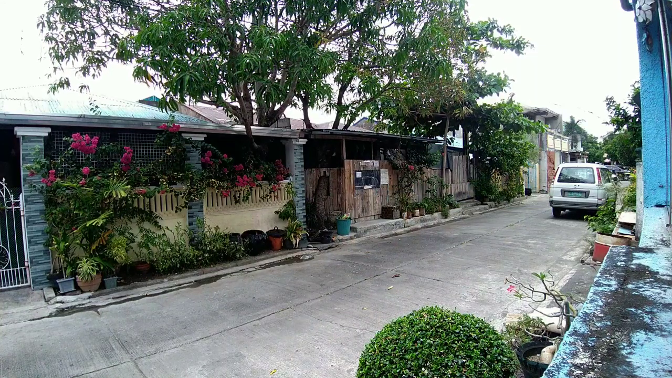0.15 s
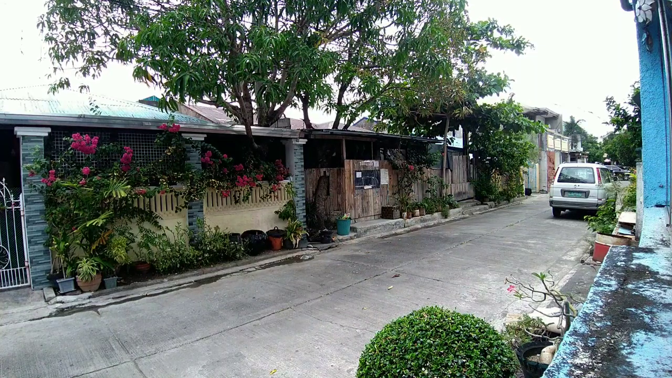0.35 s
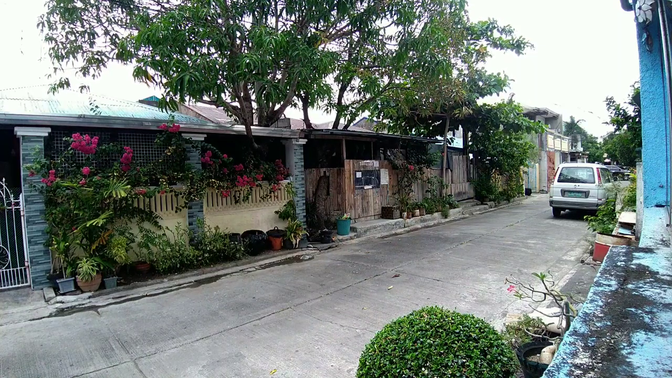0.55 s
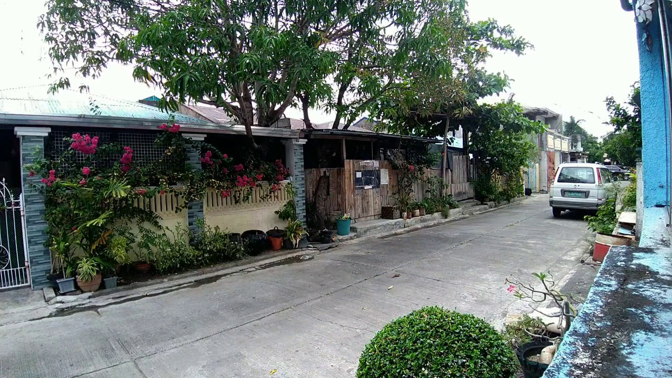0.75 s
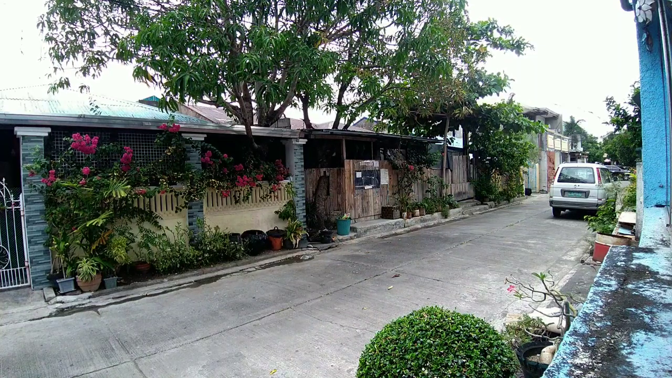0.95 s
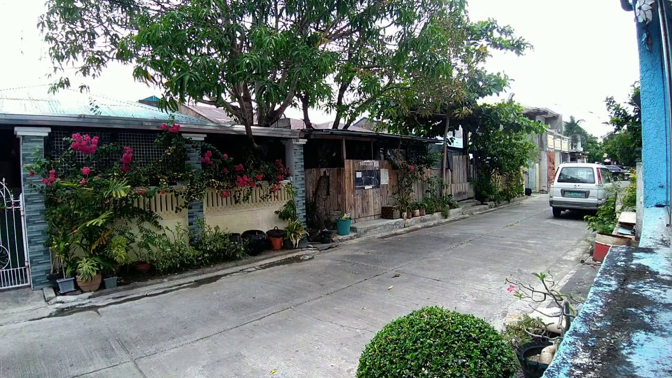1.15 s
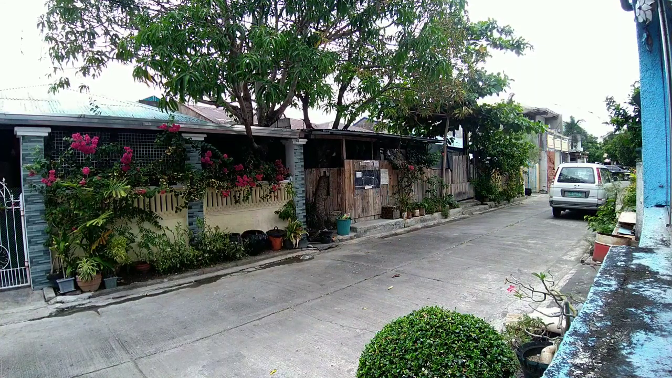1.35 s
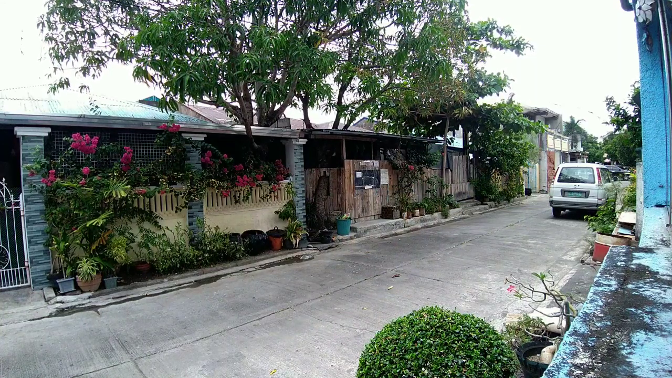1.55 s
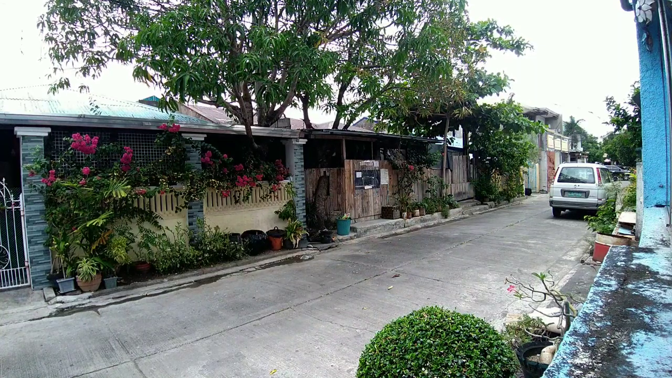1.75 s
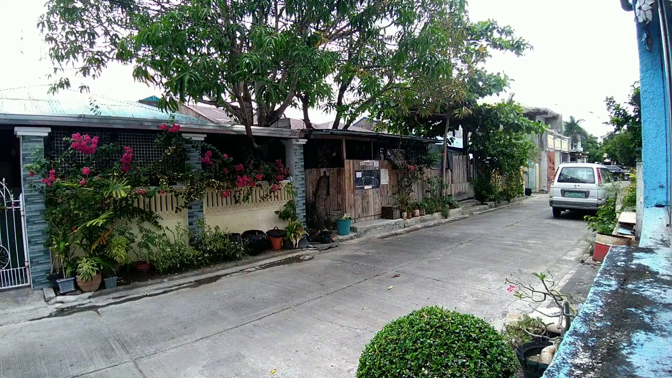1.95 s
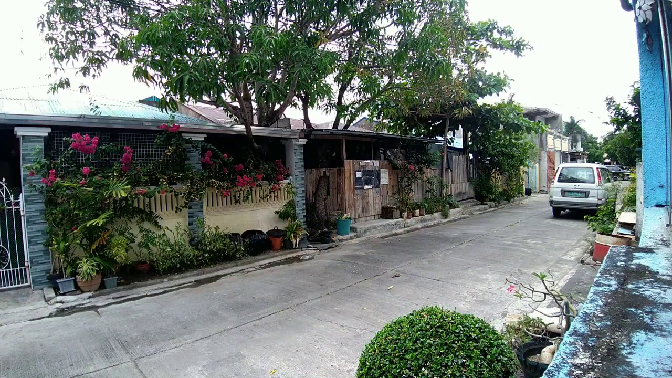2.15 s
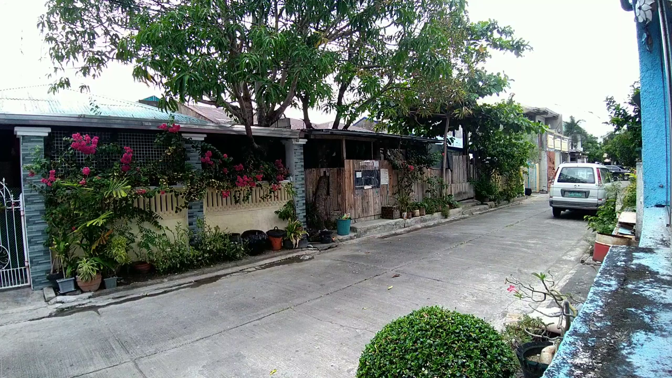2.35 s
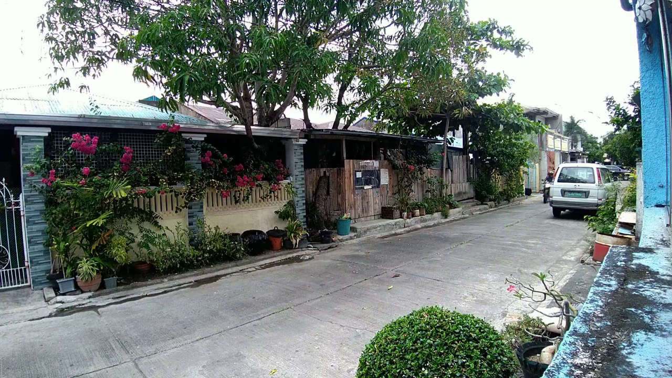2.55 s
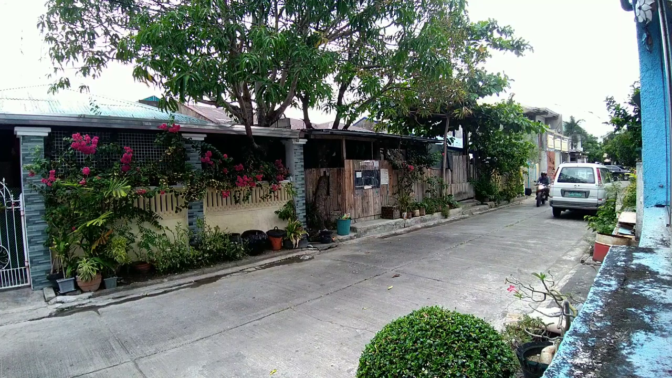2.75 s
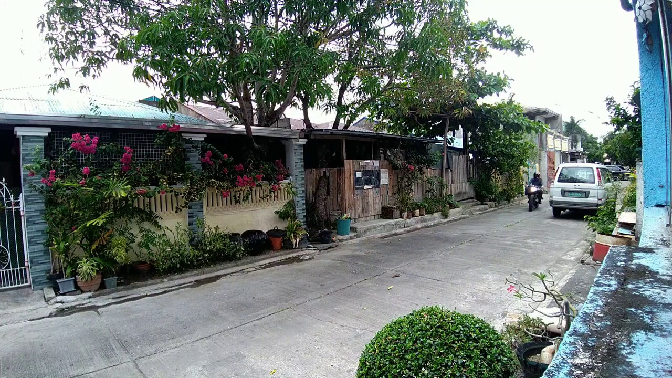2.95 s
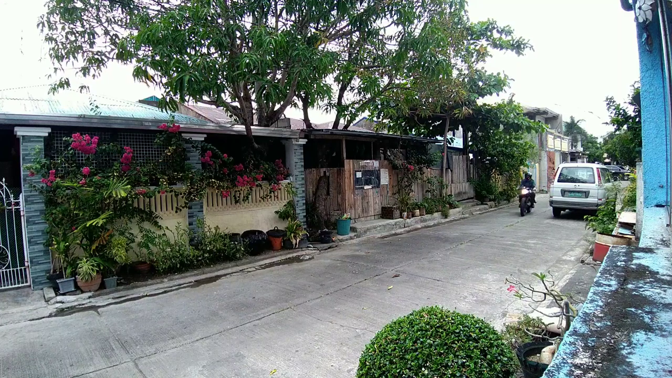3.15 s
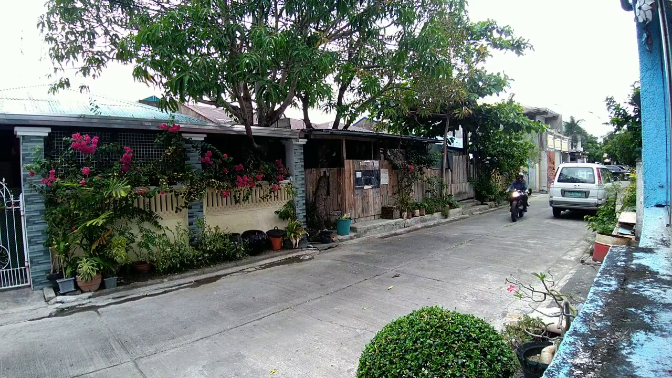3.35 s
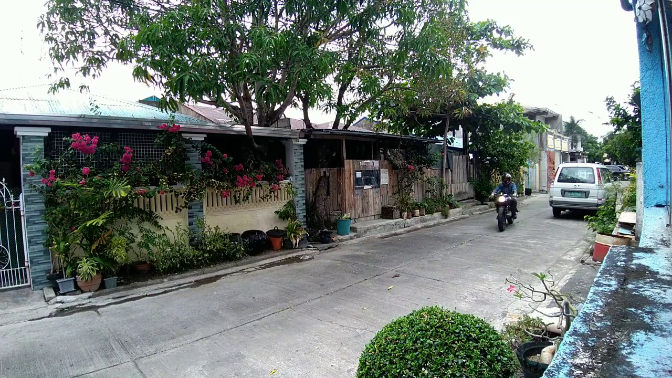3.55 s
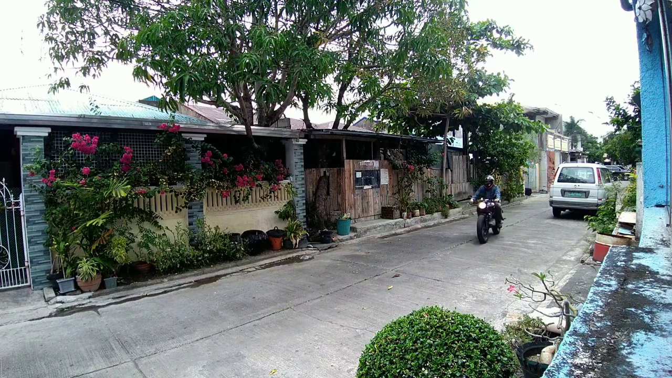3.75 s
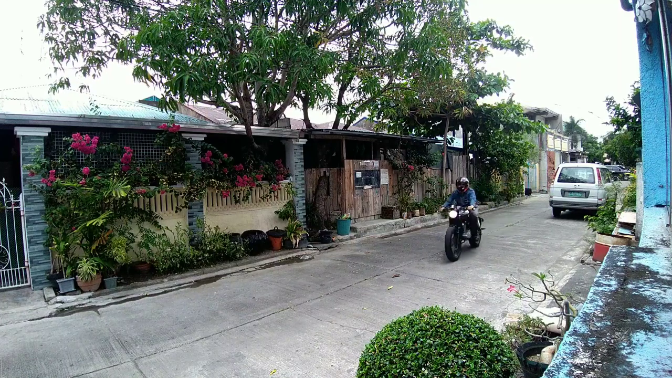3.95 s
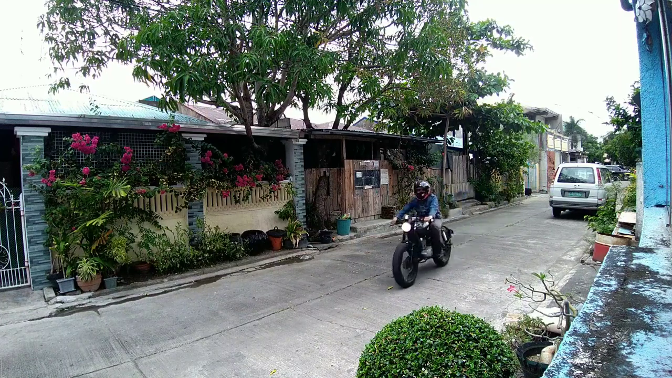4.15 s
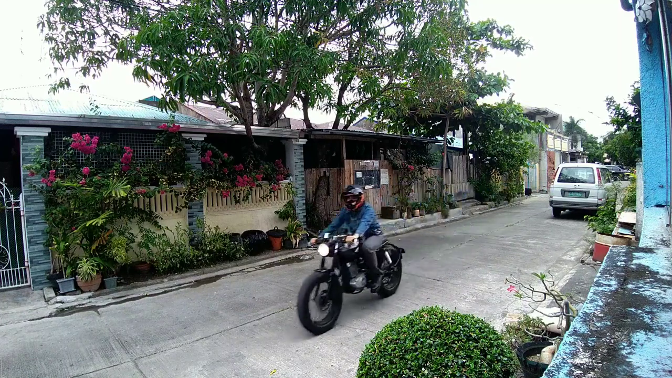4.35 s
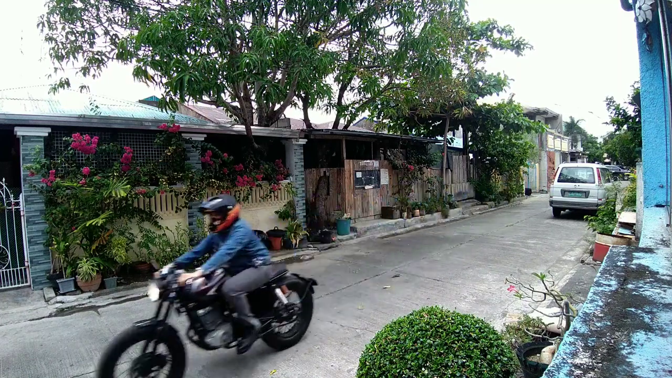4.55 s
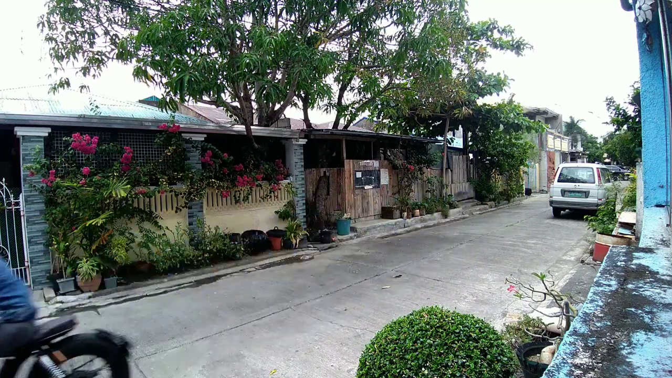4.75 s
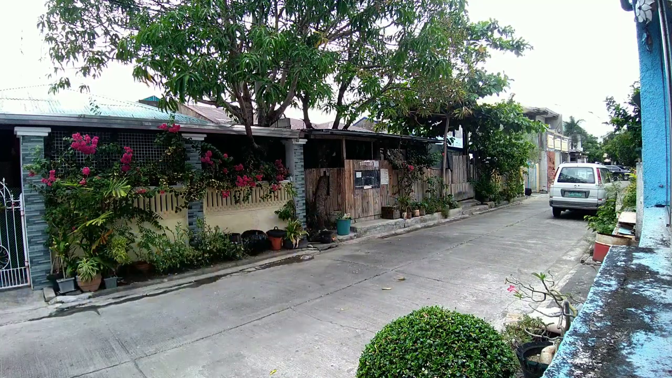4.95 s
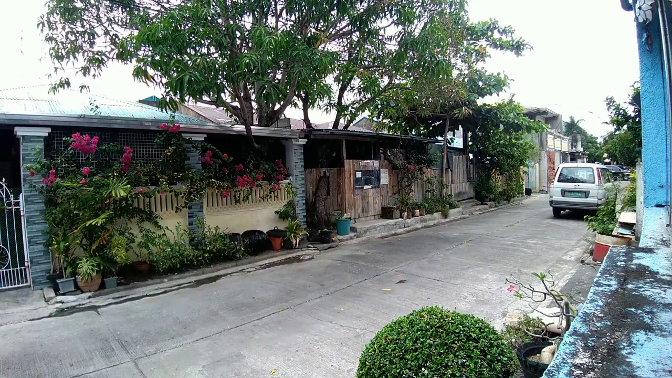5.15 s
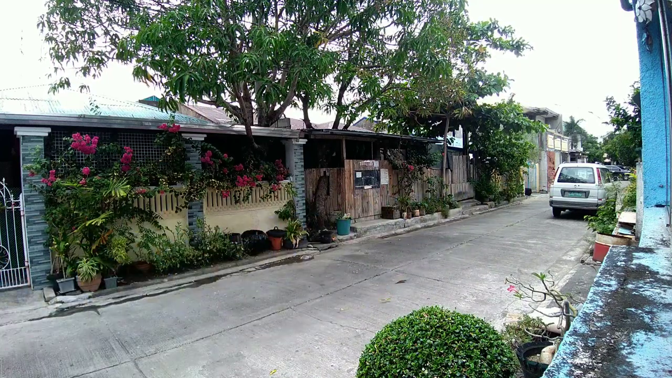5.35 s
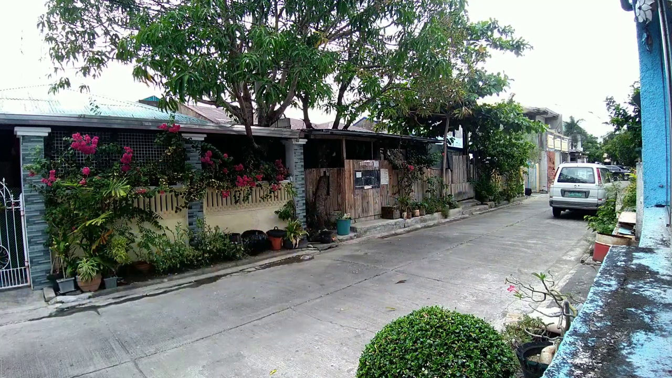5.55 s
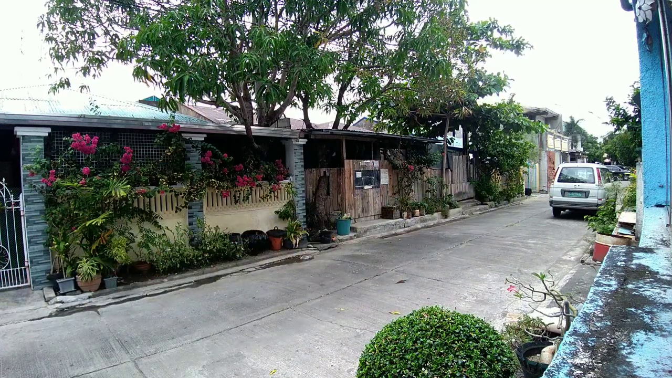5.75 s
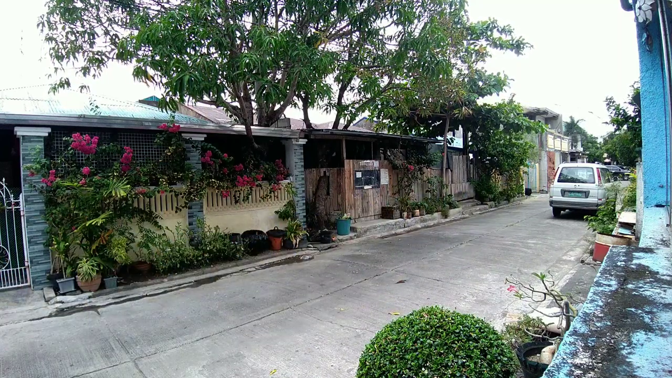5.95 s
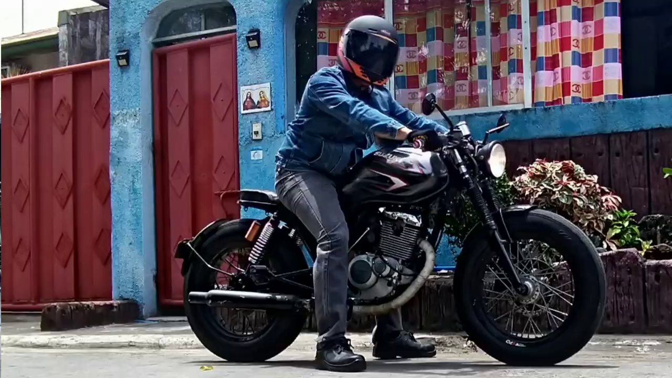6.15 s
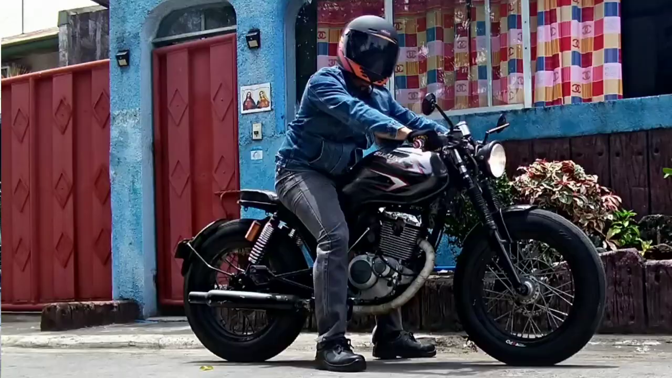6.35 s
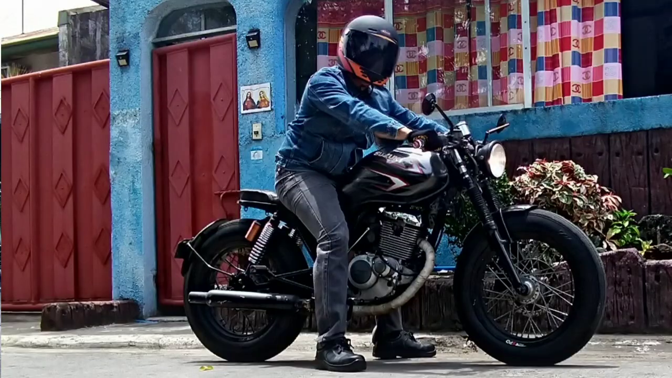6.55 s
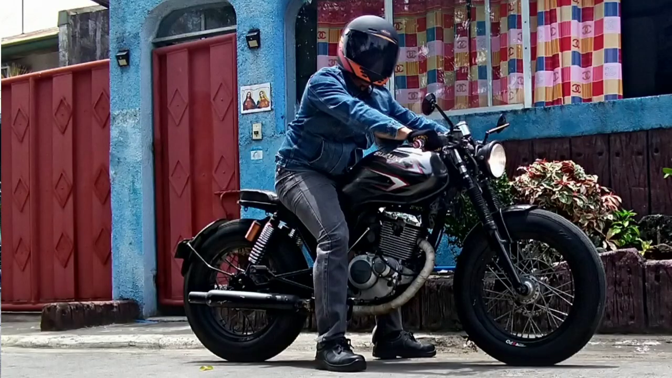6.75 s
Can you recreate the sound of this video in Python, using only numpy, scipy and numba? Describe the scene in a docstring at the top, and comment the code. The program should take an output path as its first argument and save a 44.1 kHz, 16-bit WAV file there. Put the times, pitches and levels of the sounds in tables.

```python
"""A narrow street: a single-cylinder four-stroke motorcycle accelerates and passes about three metres away.
Under throttle each firing pulse barks through the ringing modes of the silencer, with rasping gas noise.
Between throttle blips the revs sink and resonances of the pipe boom, down to a lumpy idle.
Filtered noise makes the hiss of chain and tyres and the ticking valve gear; decaying modes make metal clinks.
House fronts and a parked car throw the exhaust back; a faint hum of distant streets lies below."""
import sys
import numpy as np
from scipy import signal
from scipy.fft import rfft, irfft
from scipy.io import wavfile
from scipy.ndimage import uniform_filter1d, map_coordinates
from numba import njit

SR = 44100
rng = np.random.default_rng(int(sys.argv[2]) if len(sys.argv) > 2 else 0)


def generate_wav(sig):
    """Save sig (samples, or channels by samples) to the path in sys.argv[1] as 16-bit PCM at SR."""
    pcm = np.round(np.clip(np.atleast_2d(sig).T, -1, 1) * 32767).astype(np.int16)
    wavfile.write(sys.argv[1], SR, pcm)


N = 299560
TIME = np.arange(N) / SR
# the ride: a straight line past the kerb, coming out from behind a parked car
ROAD_M_S, PASSES_S, KERB_M, CLEARS_CAR_S = 6.31, 4.832, 2.927, 2.69
REFERENCE_HZ = 36  # firing rate from which octaves of revs are counted


def undb(db):
    """Decibels to gain."""
    return 10 ** (np.asarray(db) / 20)


def curves(table):
    """The columns of a table, joined by straight lines in time."""
    s, *columns = np.transpose(table)
    return [np.interp(TIME, s, c) for c in columns]


def steady(x):
    """Hold the RMS level at 1 over a few engine cycles, keeping the single beats."""
    size = SR // 10
    power = uniform_filter1d(uniform_filter1d(x ** 2, size), size)
    return x / np.sqrt(np.maximum(power, 1e-18))


def colour(x, points, size=8192):
    """Filter by (frequency [Hz], gain [dB]) points; minimum phase, so attacks stay sharp."""
    hz, db = np.transpose(points)
    f = np.maximum(np.arange(size // 2 + 1) * SR / size, 1)
    log_gain = np.log(undb(np.interp(np.log(f), np.log(hz), db)))
    cepstrum = irfft(log_gain)[:size // 2]
    response = irfft(np.exp(rfft(2 * cepstrum, size) - cepstrum[0]))
    response = response.reshape((1,) * (x.ndim - 1) + (-1,))
    return signal.oaconvolve(x, response, axes=-1)[..., :N]


def walk(rate):
    """Slow random curve with a spread near 1, drawn anew `rate` times a second."""
    size = int(SR / rate)
    held = np.repeat(rng.standard_normal(N // size + 1), size)
    return np.sqrt(2) * uniform_filter1d(uniform_filter1d(held, size), size)[:N]


@njit
def band(x, hz, width):
    """State-variable band-pass whose centre and width can move."""
    y, b, l = np.empty(len(x)), 0., 0.
    for i in range(len(x)):
        g, k = np.tan(np.pi * hz[i] / SR), width[i] / hz[i]
        v = (b + g * (x[i] + 1e-18 - l)) / (1 + g * (g + k))
        b, l, y[i] = 2 * v - b, l + 2 * g * v, k * v
    return y


def ring(x, hz, width):
    """A resonance: a narrow band-pass, then a broad one that softens its onset."""
    centre = hz * np.ones(N)
    return band(band(x, centre, width * np.ones(N)), centre, centre)


def delay(x, ms):
    """Delay by a fixed or moving time."""
    return np.interp(TIME - ms / 1000, TIME, x, left=0)


def diffuse(spacing_m=0.18):
    """Noise from all sides at two spaced microphones: alike in the bass, unrelated in the treble."""
    alike = np.sinc(2 * spacing_m / 343 * np.arange(N // 2 + 1) * SR / N)
    mid, side = rfft(rng.standard_normal((2, N))) * np.sqrt([1 + alike, 1 - alike])
    return irfft([mid + side, mid - side], N) / np.sqrt(2)


def burst(phase, start, length):
    """A gate that opens at one crank position and dies away within the cycle; both in cycles."""
    return np.exp(-((phase - start) % 1) / length)


def loudness(ride, db, load_db=0, octave_db=0, metre_db=0, hidden_db=0):
    """Gain of a layer: its level at the kerb, changed by load, revs, distance and the parked car's shadow."""
    rate, load, metres = ride
    octaves = np.log2(rate / REFERENCE_HZ)
    clearing_s = 0.12
    hidden = .5 - .5 * np.tanh((TIME - CLEARS_CAR_S) / clearing_s)
    level_db = db + load_db * load + octave_db * octaves
    level_db = level_db + metre_db * (metres - KERB_M) + hidden_db * hidden
    return undb(level_db) * KERB_M / metres


def crank(rate):
    """Engine cycles run so far: the speed wavers a little, and shudders at the top of the run."""
    start_cycles, hunt_cycles, hunt_per_s = .808, .011, 7
    shudder_s, shudder_length_s, shudder_hz, shudder_cycles = 3.21, .36, 4.75, .033
    since = TIME - shudder_s
    shudder = np.cos(2 * np.pi * shudder_hz * since) * np.exp(-(since / shudder_length_s) ** 4)
    run = start_cycles + np.cumsum(rate) / SR
    return run + hunt_cycles * walk(hunt_per_s) - shudder_cycles * shudder


def throttle():
    """Load 0-1 and extra dB of bark, boom and drone: opening loads the engine, shutting makes the pipe boom."""
    # twists of the throttle: (opens [s], held [s], extra bark [dB],
    # surge of the boom on shutting [dB], surge of the drone on shutting [dB])
    twists = [(-.5, 4.045, 0, 12, 12), (4.0, .15, 2, 11.5, 3), (4.35, .16, 2.5, 16, 3),
              (4.96, .22, 3.5, 15, 4), (5.83, .23, 3, 6, -4), (6.34, .28, 6, 3, 3)]
    twist_s, unload_s, surge_s = .018, 0.016, 0.41  # ramp of a twist; decay of load; decay of surge
    load, bark_db, boom_db, drone_db = np.zeros((4, N))
    for opens, held, bark, boom, drone in twists:
        shuts = opens + held
        opened, shut = (np.clip((TIME - s) / twist_s + .5, 0, 1) for s in (opens, shuts))
        since = np.maximum(TIME - shuts, 0)
        surge = shut * np.exp(-since / surge_s)
        # each twist takes over from the one before
        load += opened * (np.exp(-since / unload_s) - load)
        bark_db += opened * (bark - bark_db)
        boom_db += opened * (boom * surge - boom_db)
        drone_db += opened * (drone * surge - drone_db)
    return load, bark_db, boom_db, drone_db


def firings(phase, rate, scatter_db, idle_db, jitter_ms):
    """One pulse a cycle; combustion grows uneven as the revs drop to idle, and now and then fails."""
    # misfires with the throttle shut: time [s]
    misfires = [3.89, 4.809, 5.406, 6.209]
    misfire_s, misfire_db = 0.019, -13
    at = np.flatnonzero(np.diff(np.floor(phase)))
    chance = rng.standard_normal((len(at), 2))
    idle = np.interp(rate[at], [22, 34], [1, 0])
    missed = sum(np.exp(-((TIME[at] - s) / misfire_s) ** 2) for s in misfires)
    size = undb((scatter_db + idle_db * idle) * chance[:, 0] + misfire_db * missed)
    late = (jitter_ms * SR / 1000 * chance[:, 1]).astype(int)
    return np.bincount(np.clip(at + late, 0, N - 1), size, N)


def exhaust(pulses, phase, ride, behind, bark_db):
    """Each firing cracks out of the pipe and rings the silencer; a puff of gas rasps after it."""
    # silencer modes: (frequency [Hz], width [Hz], relative level from ahead [dB], from behind [dB])
    silencer = [(255, 26, -22, 4), (287, 79, 7, 3.5), (372.2, 46, 4, 16.5), (439.6, 37, 7.5, 10),
                (494, 16.7, 4.5, 1), (543, 47, 11, -9.5), (583, 58, -3, -28), (661, 31, -17, -6),
                (932, 42, -5, -29)]
    # tone of the rasp: (frequency [Hz], gain [dB])
    rasp_tone = [(120, -0.5), (450, 2), (650, 4), (820, 0.5), (940, 3.5), (1130, -3.5), (1330, -7.5),
                 (1550, -6.5), (1800, -33), (3000, -56)]
    # tone of the bark: (frequency [Hz], gain [dB])
    bark_tone = [(600, 2), (950, -3.5), (1400, -21)]
    rate, load, metres = ride

    # from ahead the pipe is also heard off the house front; that echo lags more as the motorcycle nears
    wall_m = 6.81  # sideways distance of the mirror image in the house front
    wall_ms = 1000 * (np.sqrt(metres ** 2 - KERB_M ** 2 + wall_m ** 2) - metres) / 343
    wall_gain = .55 * (1 - behind) * np.interp(metres, [6, 11], [.3, 1])
    blows = pulses + wall_gain * delay(pulses, wall_ms)
    # walls across the road: weaker and later
    blows = blows + .25 * (1 - .5 * behind) * delay(pulses, 7.5 + .5 * walk(4))
    # close by and past the microphones, garden walls fill the gaps between the firings
    close = np.maximum(np.interp(metres, [6, 9], [1, 0]), behind) * (.85 - .4 * behind)
    garden = .5 * delay(pulses, 9 + .6 * metres) + .45 * delay(pulses, 19.5 - .4 * metres)
    blows = blows + close * garden

    # higher revs favour the upper modes
    bright = 2 * np.log2(np.maximum(rate, 30) / REFERENCE_HZ)
    # close by and from ahead, neighbouring modes swing in opposite senses, which softens the attack
    swing = 1 - 2 * np.interp(metres, [6.5, 8.5], [1, 0]) * (1 - behind)
    bark = 0
    for k, (hz, width, ahead_db, behind_db) in enumerate(silencer):
        mode_gain = (hz / 400) ** bright * undb(ahead_db + behind * (behind_db - ahead_db))
        bark = bark + swing ** (k % 2) * ring(blows, hz, width) * mode_gain
    bark = steady(colour(bark, bark_tone)) * undb(bark_db)

    # just past the parked car the pipe points at it; that echo recedes, so it sounds a little flat
    car_echo_db, car_aim_m, car_spread_m = -6, 3.58, 1.2
    past_m = ROAD_M_S * np.maximum(TIME - CLEARS_CAR_S, 0)
    car_ms = 2 * 1000 * past_m / 343
    aimed = np.exp(-((past_m - car_aim_m) / car_spread_m) ** 2)
    bark = (bark + undb(car_echo_db) * aimed * delay(bark, car_ms)) * undb(4.4 * aimed)

    gas = (burst(phase, 0.03, 0.3) + 0.35) * rng.standard_normal(N)
    crack = np.interp(metres, [5, 9], [.6, 1.1]) * (1 - .3 * behind)
    rasp = steady(crack * steady(colour(blows, rasp_tone)) + .45 * steady(colour(gas, rasp_tone)))
    bark_gain = loudness(ride, db=-38.5, load_db=12.5, octave_db=9.5, metre_db=-0.0966, hidden_db=2.0)
    rasp_gain = loudness(ride, db=-43, load_db=4, octave_db=39, metre_db=0.3156, hidden_db=-2.5)
    return bark * bark_gain + rasp * rasp_gain


def pipe_notes(pulses, ride, boom_db, drone_db):
    """The pipe's low notes: a boom, lower and longer at idle, and a drone that follows the revs under load."""
    # tone of the boom: (frequency [Hz], gain [dB])
    boom_tone = [(170, 5), (280, -5), (1000, -35)]
    # tone of the drone: (frequency [Hz], gain [dB])
    drone_tone = [(230, 7), (320, -16), (1000, -17)]
    rate, load, metres = ride
    revs = rate / REFERENCE_HZ
    pull = load * np.clip((rate - 24) / 8, 0, 1)
    boom = ring(pulses, 105 * revs ** .33, width=20 * revs ** 1.3)
    boom = steady(colour(boom, boom_tone)) * undb(boom_db - 8.1 * pull)
    boom = boom * loudness(ride, db=-26.5, octave_db=-3, metre_db=0.35)
    drone_hz = 158 + load * (4.7 * np.maximum(rate, 32) - 158)
    drone = ring(pulses, drone_hz, width=55 + 45 * load)
    drone = steady(colour(drone, drone_tone)) * undb(drone_db)
    # far off the drone is weaker and wavers
    fading_db = np.interp(metres, [6, 12], [0, 1]) * (1.5 * walk(9) - 4.5)
    drone = drone * undb(fading_db) * loudness(ride, db=-26.5, load_db=1.0, octave_db=12.5, metre_db=0.0982)
    return boom - drone  # neighbouring modes swing in opposite senses


def growl(phase, ride, behind, boom_db):
    """Overtones of the revs swell between firings: with the throttle shut, and close by from ahead."""
    # overtones: (multiple of the firing rate, relative level [dB], slope [dB per octave of revs])
    overtones = [(9.17, -8.5, 54), (10.02, -1, 32), (11, -14, -3), (12, -9, 39), (12.8, -19, 25),
                 (13.81, -7.5, 30), (14.52, -17, 10), (16.5, -16, 18), (21.3, -23, 32), (23.8, -19, 31),
                 (31.4, -20, 35)]
    swell_cycle = 0.2935  # where in the cycle the growl swells, after the firing
    rate, load, metres = ride
    octaves = np.log2(rate / REFERENCE_HZ)
    close = np.interp(metres, [5, 7], [1, 0]) * (1 - behind)
    tones = 0
    for k, db, octave_db in overtones:
        tone_gain = undb(db + octave_db * octaves + walk(14))
        tones = tones + tone_gain * np.cos(2 * np.pi * k * (phase - swell_cycle) + .5 * walk(4))
    drive_db = np.maximum(.65 * boom_db, 6 * load * close)
    drive = undb(drive_db) * np.clip(boom_db / 3 + close, 0, 1)
    return tones * drive * loudness(ride, db=-35, metre_db=0.23)


def hum(phase):
    """The second harmonic of the firings carries far as a low hum."""
    # RMS level of the hum, then smoothed: (time [s], level [dB])
    hum_level = [(0.3, -61), (0.9, -43), (1.25, -38.5), (1.6, -50), (2.0, -48), (2.2, -33.5), (2.47, -31),
                 (2.63, -35.5), (2.75, -32.5), (3.0, -34.5), (3.1, -41), (3.4, -34.5), (3.55, -43),
                 (3.9, -60), (4.05, -31.5), (4.6, -30.5), (4.9, -41), (5.2, -63)]
    gain = undb(uniform_filter1d(curves(hum_level)[0], size=SR // 20))
    return -np.sqrt(2) * np.sin(4 * np.pi * phase) * gain


def running_gear(phase, ride):
    """Chain and tyres hiss, sinking in pitch as they pass; the engine clatters at firings and valve shuttings."""
    # tone of the clatter: (frequency [Hz], gain [dB])
    clatter_tone = [(300, -31.5), (1000, 4.5), (1700, 1), (2600, -0.5), (4200, -3), (6000, -3.5),
                    (8000, -4), (11000, -12)]
    # tone of the hiss: (frequency [Hz], gain [dB])
    hiss_tone = [(3240, -47), (5500, -17), (8440, -8), (11100, 4.5), (14000, -9.5), (15100, -8),
                 (15800, -31)]
    flare_s, flare_length_s, flare_db = 4.465, 0.089, 3.5  # the clatter flares briefly
    knocks = 0.097 * burst(phase, 0, 0.019) + 0.069 * burst(phase, 0.29, 0.038)
    grain = undb(0.99 * walk(400) + 1.6 * walk(14))
    sent = (TIME - (ride[2] - KERB_M) / 343) * SR  # sample being heard: Doppler
    still = colour(rng.standard_normal((2, N)), hiss_tone)
    hiss = np.array([map_coordinates(side, [sent], mode="mirror") for side in still])
    hiss = steady(hiss * grain * (1 + .5 * knocks))
    flare = undb(flare_db * np.exp(-((TIME - flare_s) / flare_length_s) ** 2))
    clatter = colour(rng.standard_normal((2, N)) * grain * (1 + knocks), clatter_tone)
    clatter = steady(clatter) * flare
    hiss_gain = loudness(ride, db=-34.0, load_db=0.0, octave_db=8.5, metre_db=-0.4526, hidden_db=-3.0)
    clatter_gain = loudness(ride, db=-41.5, load_db=1.0, octave_db=11.0, metre_db=0.1022, hidden_db=-3.5)
    return hiss * hiss_gain + clatter * clatter_gain


def clinks():
    """Loose metal jolted by the road and the lumpy idle; each jolt scrapes and favours other modes."""
    # jolts: (time [s], gain [dB], where it rings most [Hz])
    jolts = [(4.949, -30.5, 5430), (5.25, -52, 8800), (5.427, -47, 4650), (5.467, -47.5, 7360),
             (5.857, -51, 4770), (5.901, -49, 4700), (5.948, -50.5, 4550), (5.9913, -50, 5350),
             (6.3663, -45, 12300), (6.416, -47.5, 7300), (6.4613, -51, 7500), (6.502, -52, 7400),
             (6.545, -53, 7000)]
    # modes of the metal: (frequency [Hz], relative level [dB])
    metal = [(4600, -5), (5150, 0.5), (5450, -8), (6080, -17), (7450, -8.5), (8900, -14), (11250, 10.5),
             (11780, -8)]
    t60_s, attack_s = .11, 0.00097
    favoured_octaves, spill = 0.073, 0.48  # spread of the favoured modes; share left to the others
    out, t = np.zeros((2, N + SR)), TIME[:SR // 5]
    hz, db = np.transpose(metal)
    for s, level_db, centre_hz in jolts:
        favoured = np.exp(-(np.log2(hz / centre_hz) / favoured_octaves) ** 2)
        sizes = undb(db) * (spill + favoured)
        modes = sizes @ np.sin(2 * np.pi * (hz[:, None] * t + rng.random((2, len(hz), 1))))
        noise = rng.standard_normal((2, len(t)))
        centre, width = np.full(len(t), float(centre_hz)), np.full(len(t), centre_hz / 5)
        scrape = np.array([band(side, centre, width) for side in noise])
        hit = (.6 * modes + 2.2 * scrape + .5 * noise) * np.exp(-np.log(1000) * t / t60_s)
        i = int(s * SR)
        out[:, i:i + len(t)] += undb(level_db) * hit * np.minimum(t / attack_s, 1)
    return out[:, :N]


def street_echo(x, t60_s=0.93, gap_s=0.0091):
    """House fronts and parked cars scatter the sound into a short tail with little bass."""
    tail = diffuse() * np.exp(-np.log(1000) * TIME / t60_s) * np.clip(TIME / gap_s - .5, 0, 1)
    tail = tail / np.sqrt(np.sum(tail[0] ** 2))
    tail = colour(tail, [(20, 0), (110, 2), (300, 5), (900, 5), (4000, 6), (16000, -11)])
    return signal.fftconvolve(x[None], tail[:, :SR], axes=1)[:, :N]


def neighbourhood():
    """A faint, nearly steady hum of distant streets: coloured diffuse noise."""
    # tone of the distant streets: (frequency [Hz], gain [dB])
    street_tone = [(15, -95), (25, -11), (71, -11), (202, -14.5), (278, -5), (515, -16.5), (811, -35.5),
                   (5280, -51), (10000, -37), (13500, -52), (15000, -85)]
    swell_db = walk(1)
    return steady(colour(diffuse(), street_tone)) * undb(-45 + swell_db)


def scene():
    """The motorcycle reaches the left microphone first, later the right; the echo counts most far off."""
    # engine speed: (time [s], firing rate [1/s])
    speed = [(0.0, 28.44), (0.27, 32.1), (0.9, 34.38), (1.55, 39.64), (2.11, 41.68), (2.41, 43.13),
             (3.49, 45.53), (3.94, 34.08), (4.16, 37.32), (4.32, 33.57), (4.47, 38.96), (4.96, 28.98),
             (5.19, 32.51), (5.5, 25.36), (5.8, 20.44), (6.05, 23.51), (6.28, 19.22), (6.58, 25.06),
             (6.79, 23.89)]
    # gain of bark and rasp on the way up: (time [s], gain [dB])
    approach = [(0, -7), (.6, -2), (1.3, 2.5), (1.8, 1.5), (2.3, -2.5), (3.0, -0.5)]
    aim_rad, port_lag_ms = 0.94, 0.66  # turn of the microphone pair; largest lag between the two
    rate, = curves(speed)
    phase = crank(rate)
    load, bark_db, boom_db, drone_db = throttle()
    along = ROAD_M_S * (TIME - PASSES_S)
    metres = np.hypot(along, KERB_M)
    ride = rate, load, metres
    bearing = np.sin(np.arctan2(along, KERB_M) + aim_rad)
    behind = np.interp(bearing, [-.65, .15], [0, 1])  # share of the pipe mouth in view

    pulses = firings(phase, rate, scatter_db=.8, idle_db=1.2, jitter_ms=0.04)
    pipe = pipe_notes(pulses, ride, boom_db, drone_db) + growl(phase, ride, behind, boom_db)
    pipe = pipe + exhaust(pulses, phase, ride, behind, bark_db) * undb(curves(approach)[0])
    echo = undb(-11.5 + .19 * metres)
    pipe = pipe / np.sqrt(1 + 3.0 * echo ** 2)  # make room for the echo
    near = pipe + hum(phase)
    lag_ms = port_lag_ms * bearing
    direct = np.array([delay(near, lag_ms / 2), delay(near, -lag_ms / 2)])
    return direct + street_echo(pipe * echo) + running_gear(phase, ride) + clinks() + neighbourhood()


def record(dry):
    """The left microphone is the weaker one over most of the range; the top is cut steeply."""
    left = colour(dry[0], [(15, -2.0), (150, -5.0), (1000, -4.5), (2500, -2.0), (5000, -2.5),
                           (8500, -3.5), (12000, -6.0), (17000, 2.0)])
    right = dry[1] * undb(2.0)
    top_hz = 15800
    steep = signal.ellip(10, .2, 70, top_hz, fs=SR, output="sos")
    return signal.sosfilt(steep, np.array([left, right]))


dry = scene()
out = record(dry)
generate_wav(out)
```